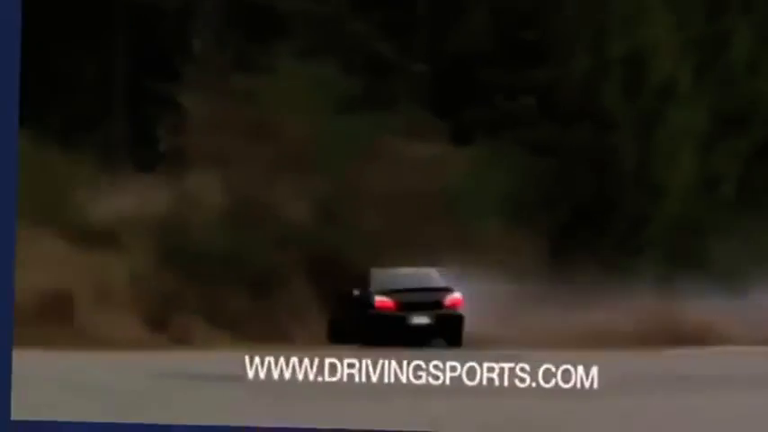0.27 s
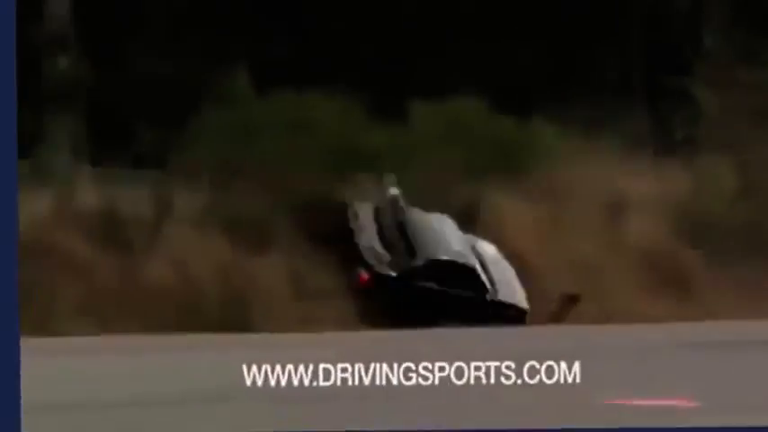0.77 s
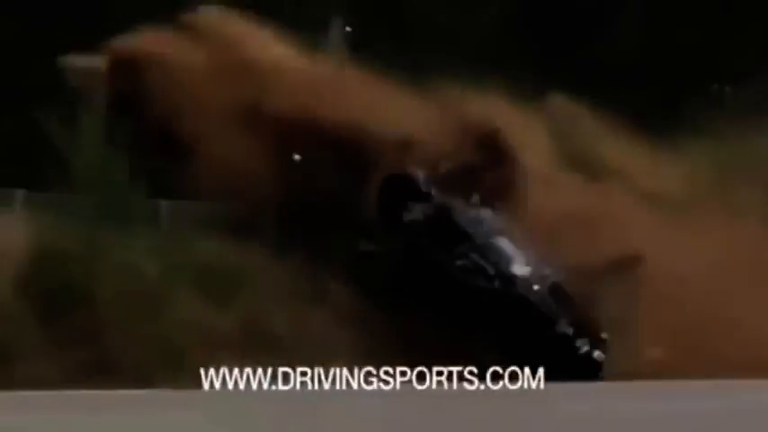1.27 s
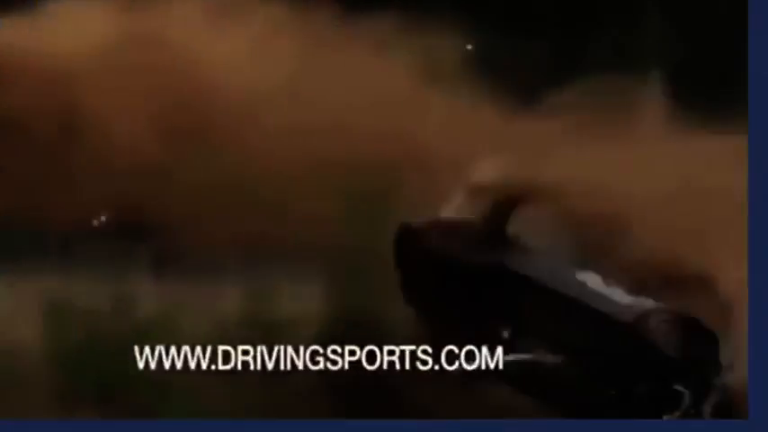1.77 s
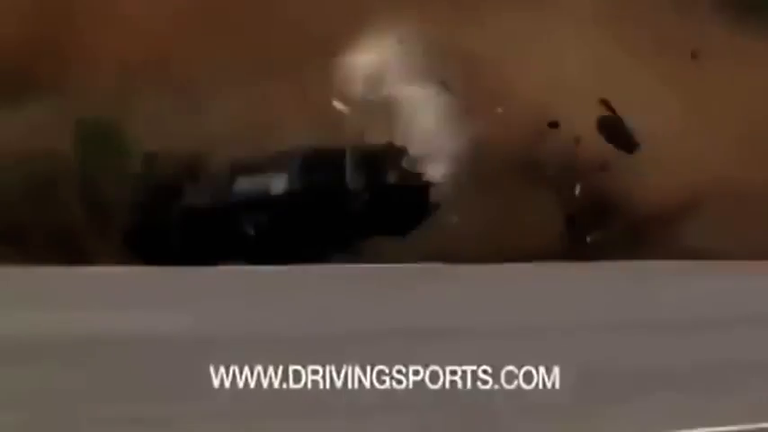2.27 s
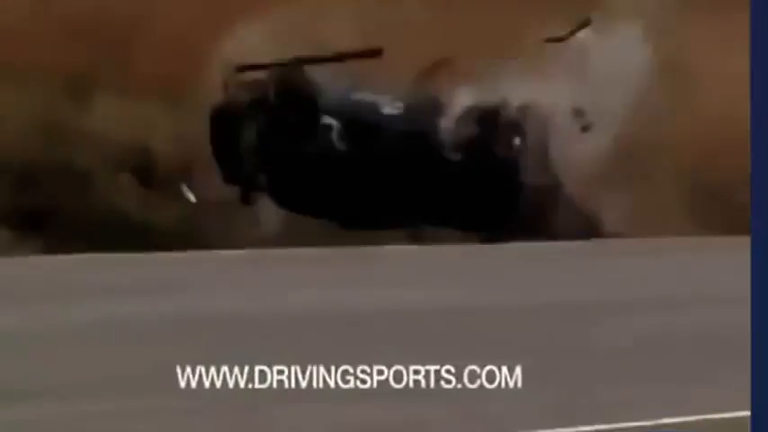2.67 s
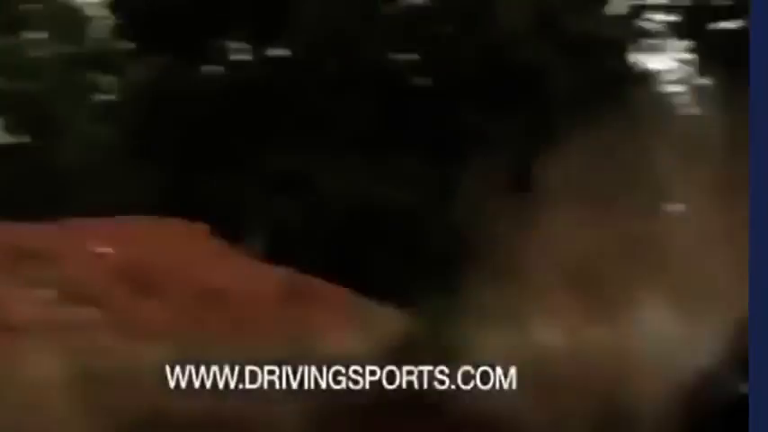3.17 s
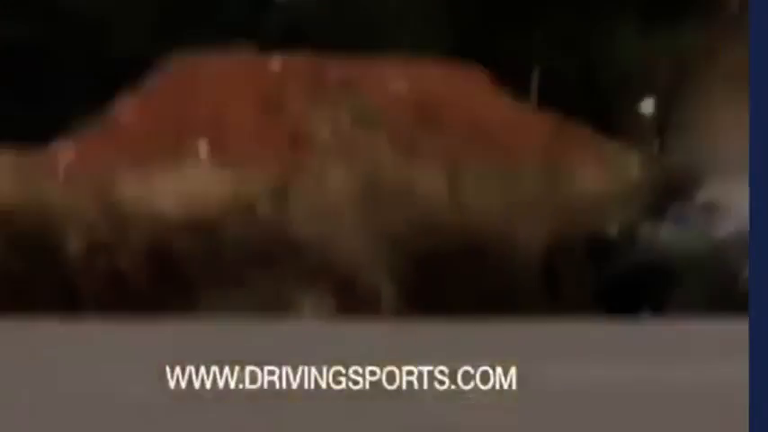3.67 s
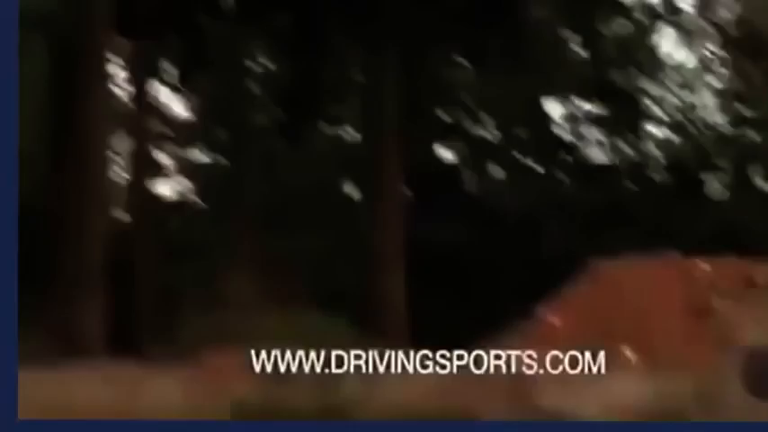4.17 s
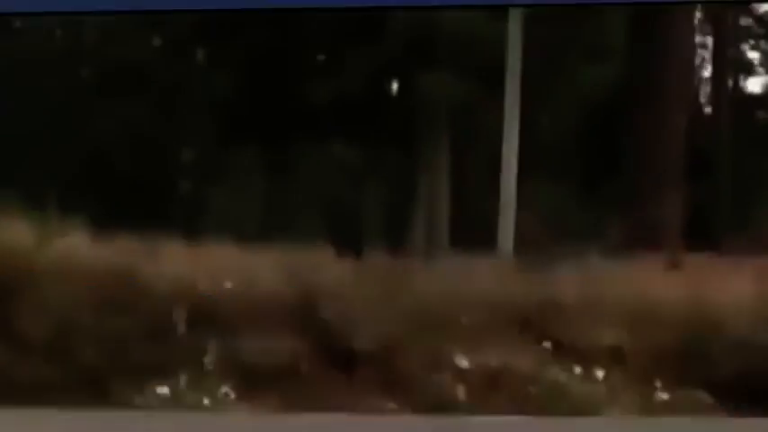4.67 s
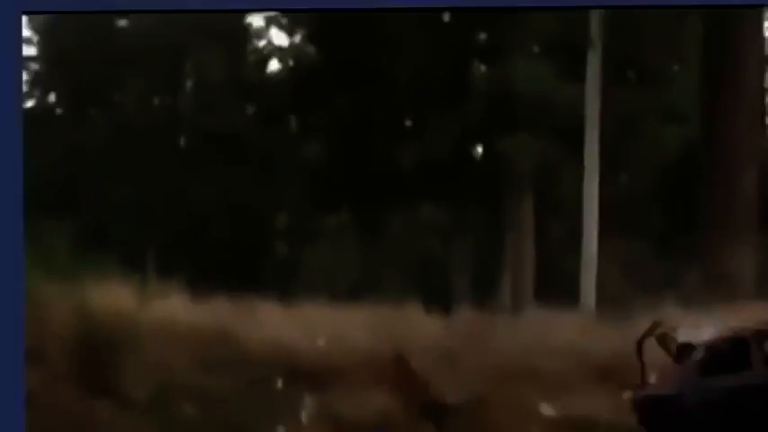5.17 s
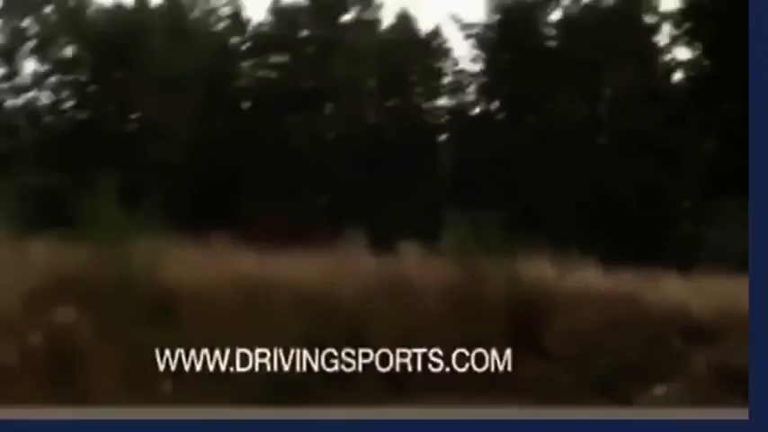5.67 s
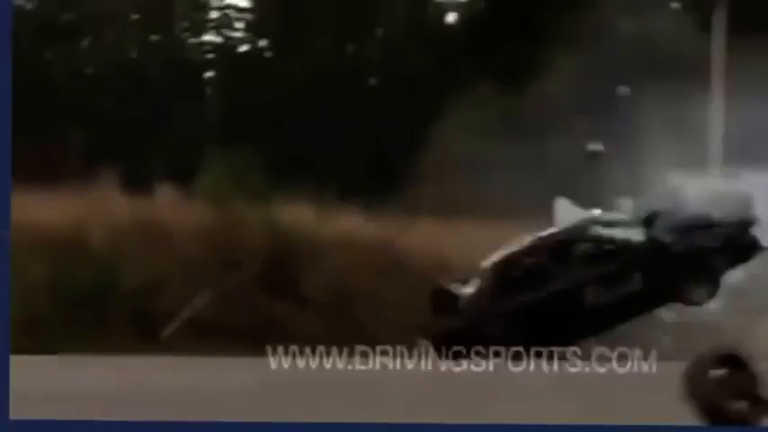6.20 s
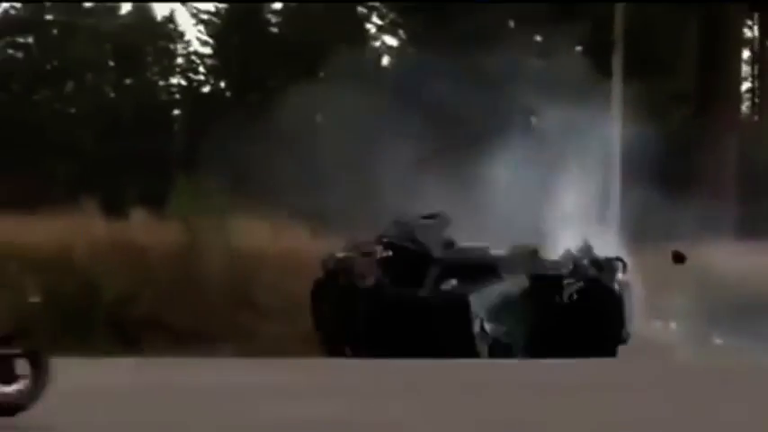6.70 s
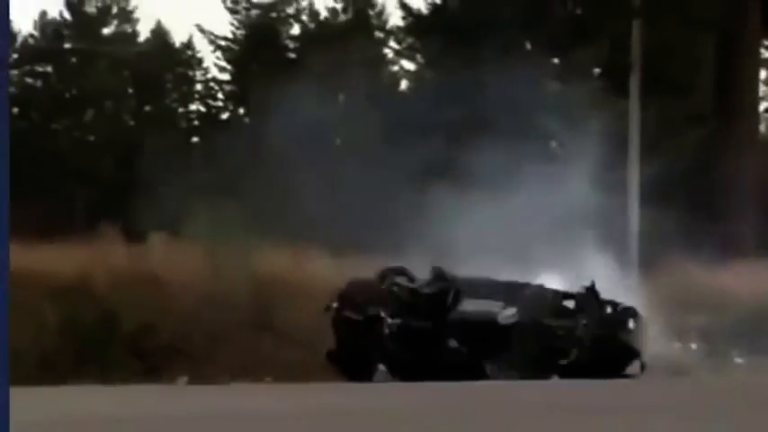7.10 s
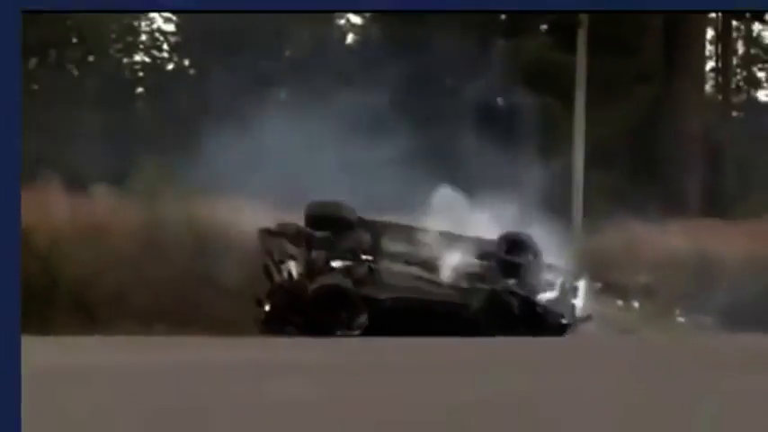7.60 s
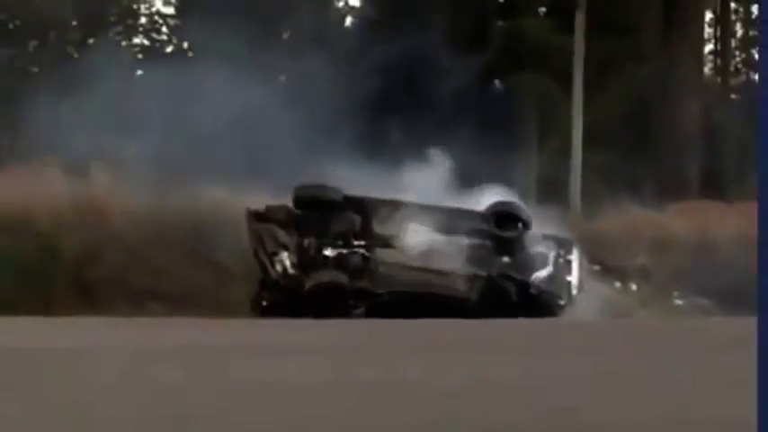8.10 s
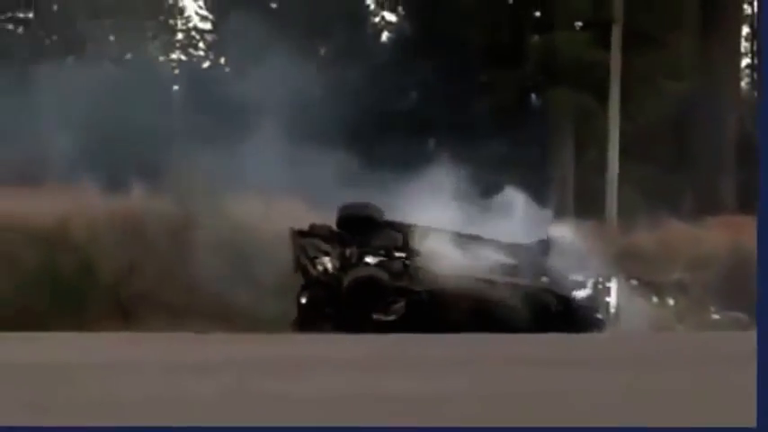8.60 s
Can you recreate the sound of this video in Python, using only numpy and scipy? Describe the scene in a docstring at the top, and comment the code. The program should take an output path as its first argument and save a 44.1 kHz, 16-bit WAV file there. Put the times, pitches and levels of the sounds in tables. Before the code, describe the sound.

A car crash is heard from a distance in the open air. A short, soft tyre skid gives way to a long run of uneven, heavy thuds and metal crunches as the car tumbles over dirt and tarmac. Grinding metal, spraying grit and a few small pings fill the gaps. The impacts grow denser, then weaken as the wreck settles, with a faint climbing hum and a small part rattling to the left.

```python
"""Tyres scrub and squeal over a low rumble as a car slides off the tarmac, outdoors and some way off.
It meets an earth bank and rolls over many times. Ground contact forces the shell to boom and drum,
buckling panels crack and clang in their modes, shards ring, and gravel and fragments rain down.
Near the end a torn-off part clanks on the left and a faint low hum climbs in pitch."""
import sys
import numpy as np
from scipy import signal
from scipy.fft import rfft, irfft
from scipy.io import wavfile
from scipy.ndimage import uniform_filter1d

SR = 44100
rng = np.random.default_rng(int(sys.argv[2]) if len(sys.argv) > 2 else 0)


def to_wav(sig):
    """Store sig (one row per channel, or 1-D mono) as 16-bit WAV at the path in sys.argv[1].

    Samples outside -1..1 are clipped; the rate is SR.
    """
    pcm = np.clip(np.atleast_2d(sig), -1, 1) * 32767
    pcm = np.round(pcm).astype(np.int16)
    wavfile.write(sys.argv[1], SR, pcm.T)  # frames by channels


N = 390285


def from_db(db):
    """Amplitude ratio of a level in decibels."""
    return 10 ** (np.asarray(db) / 20)


def rms_one(x):
    """Normalisation to an rms of 1."""
    return x / np.sqrt(np.mean(x ** 2) + 1e-20)


def in_time(rows):
    """Linear interpolation: each column after the time becomes a curve with one value a sample."""
    s, *columns = np.transpose(rows)
    return [np.interp(np.arange(N) / SR, s, column) for column in columns]


def colour(x, spectrum):
    """Minimum-phase filtering by a spectrum whose rows give frequency in Hz and gain in dB."""
    size = 2 ** 14
    hz, db = np.transpose(spectrum)
    grid_hz = np.maximum(np.arange(size // 2 + 1) * SR / size, 1)
    gain = from_db(np.interp(np.log(grid_hz), np.log(hz), db))
    cepstrum = irfft(np.log(gain))
    cepstrum[1:size // 2] *= 2   # folding onto positive time makes the filter causal
    cepstrum[size // 2 + 1:] = 0
    return signal.fftconvolve(x, irfft(np.exp(rfft(cepstrum))))[:N]


def drift(hz):
    """Random fluctuation: noise low-passed at the given frequency, rms 1."""
    r = np.exp(-2 * np.pi * hz / SR)
    return rms_one(signal.lfilter([1], [1, -2 * r, r * r], rng.standard_normal(N + SR))[SR:])


def resonate(x, hz, width_hz):
    """Forced response of a damped oscillator, with gain 1 at resonance."""
    r = np.exp(-np.pi * width_hz / SR)
    feedback = [1, -2 * r * np.cos(2 * np.pi * hz / SR), r * r]
    return signal.lfilter([(1 - r * r) / 2, 0, (r * r - 1) / 2], feedback, x)


def contacts(spectrum, per_s, spread_db, level_db):
    """Shot noise: random knocks of uneven size, filtered by a spectrum, follow a level curve."""
    sizes = from_db(spread_db * np.minimum(rng.exponential(1, N), 4)) * rng.choice([-1, 1], N)
    knocks = sizes * (rng.random(N) < per_s / SR)
    return rms_one(colour(knocks, spectrum)) * from_db(level_db)


def blow(t60, rise_s, bend=1):
    """Impact envelope: a quick rise and a 60 dB fall in t60 (0.02 to 1 s), steepening if bend > 1."""
    t = np.arange(SR // 2) / SR
    fall_db = 60 * np.minimum((t / np.clip(t60, .02, 1)) ** bend, 5)
    return (1 - np.exp(-t / rise_s)) * from_db(-fall_db)


def add(track, part, s):
    """Superposition of a short sound on a track, starting at s seconds."""
    at = round(s * SR)
    track[at:at + len(part)] += part[:N - at]


# Spectrum of the open air. Each row: frequency in Hz, relative level in dB.
AIR_SPECTRUM = [(18, -36), (30, -25), (178, -28), (291, -27), (527, -2), (1030, -40), (2560, -8.5),
                (4200, -17.5), (5650, -14), (11000, -14)]


def open_air():
    """Ambient noise: a faint, gently stirring hiss, uncorrelated between the two sides."""
    levels_db = [-69.5 + 1.5 * drift(12) for side in range(2)]
    return [from_db(db) * rms_one(colour(rng.standard_normal(N), AIR_SPECTRUM)) for db in levels_db]


# Level of the smeared copy against the car's own sound. Each row: frequency in Hz, gain in dB.
SMEAR_SPECTRUM = [(60, -31), (340, -69), (1950, -27.5), (11200, -2.5)]


def side_smear(car):
    """Decorrelation: a faint, mostly high, smeared copy of the car, opposite in sign on each side, sets the two
    sides slightly apart."""
    response = rng.standard_normal(SR // 2) * blow(t60=0.02, rise_s=0.002)
    smear = signal.fftconvolve(car, response / np.linalg.norm(response))[:N]
    return colour(smear, SMEAR_SPECTRUM) * np.array([[1], [-1]])


# Course of the hum. Each row: time in seconds, frequency in Hz, rms level of the upper tone in dB.
HUM_GLIDE = [(7.95, 109.5, -58), (8.606, 132, -52.5), (8.85, 135, -65)]


def hum():
    """Frequency glide: a faint low tone climbs with a weaker one at two thirds of its frequency."""
    hz, db = in_time(HUM_GLIDE)
    phase = 2 * np.pi * np.cumsum(hz) / SR
    fade_in = np.clip((np.arange(N) / SR - HUM_GLIDE[0][0]) / 0.048, 0, 1)
    return np.sqrt(2) * from_db(db) * fade_in * (np.sin(phase) + from_db(-6.5) * np.sin(phase * 2 / 3))


# Landings of a torn-off part. Each row: start in seconds, level in dB, rattling time in seconds.
PART_LANDINGS = [(8.075, -51, .05), (8.241, -45, .018), (8.827, -50, .03)]
# Modes of that part. Each row: frequency in Hz, relative level in dB.
PART_MODES = [(1610, 0.5), (2040, 4.5), (2600, 6), (3500, 2), (5200, 1), (5600, -0.5), (6200, -4)]


def loose_part():
    """Modal ringing: a part rattles on the tarmac to the left, and every touch excites its modes."""
    left_lead_db, t60, touches_per_s = 10.5, 0.023, 3000
    out = np.zeros(N)
    t = np.arange(SR // 4) / SR
    for s, db, rattle_s in PART_LANDINGS:
        sizes = from_db(3.4 * rng.exponential(1, len(t))) * rng.choice([-1, 1], len(t))
        touches = sizes * (rng.random(len(t)) < touches_per_s / SR)
        envelope = np.minimum(t / 0.0013, 1) * from_db(-60 * np.maximum(t - rattle_s, 0) / t60)
        modes = sum(from_db(mode_db) * resonate(touches, hz, width_hz=260) * (-1) ** k
                    for k, (hz, mode_db) in enumerate(PART_MODES))
        add(out, from_db(db) * envelope * rms_one(modes), s)
    return out * from_db([[left_lead_db / 2], [-left_lead_db / 2]])


# Ringing glass and metal. Each row: start in seconds, level in dB, frequency in Hz.
SHARD_PINGS = [(2.326, -40.5, 3400), (4.547, -42, 4530), (4.703, -28, 2950), (5.757, -49, 4440)]


def shards():
    """Damped free vibration: each shard rings briefly on an unsteady pitch."""
    out = np.zeros(N)
    for s, db, hz in SHARD_PINGS:
        envelope = blow(t60=0.08, rise_s=0.00064)
        waver = 1 + .03 * drift(300)[:len(envelope)]
        phase = 2 * np.pi * hz * np.cumsum(waver) / SR
        add(out, from_db(db) * envelope * np.sin(phase), s)
    return out


# Loudness of the sliding tyres. Each row: time in seconds, level in dB.
SCRUB_LEVELS = [(0.0, -43), (0.01, -49.5), (0.772, -65.5), (0.97, -61.5)]
# Spectrum of their scrubbing. Each row: frequency in Hz, relative level in dB.
SCRUB_SPECTRUM = [(530, -34), (900, -5), (1190, -13), (2200, -16.5), (3900, -34), (5070, -65), (8580, -120)]
# Squeal of the rubber. Each row: time in seconds, frequency in Hz, level in dB.
SQUEAL_GLIDE = [(0.05, 1350, -52.5), (.2, 1364, -60), (.29, 968, -58), (.49, 613, -48.5)]


def skid():
    """Sliding friction: tyres scrub on tarmac, then more faintly on grass, with a falling squeal."""
    t = np.arange(N) / SR
    (scrub_db,) = in_time(SCRUB_LEVELS)
    scrub = contacts(SCRUB_SPECTRUM, per_s=11000, spread_db=2.0, level_db=scrub_db + 3.0 * drift(14))
    hz, squeal_db = in_time(SQUEAL_GLIDE)
    unsteady_slip = 1 + .05 * drift(90)
    phase = 2 * np.pi * np.cumsum(hz * unsteady_slip) / SR
    hoarseness_db = 4.0 * drift(60)
    squeal = from_db(squeal_db + hoarseness_db) * np.sin(phase)
    return (t < SCRUB_LEVELS[-1][0]) * scrub + (t < SQUEAL_GLIDE[-1][0]) * squeal


def fragments(per_s, quality):
    """Poisson impacts: loose fragments tick at random, each on one of 14 resonances; rms 1."""
    pitches_hz = np.geomspace(1300, 3600, num=14)
    sizes = from_db(7.0 * np.minimum(rng.exponential(1, N), 4))
    hits = sizes * (rng.random(N) < per_s / SR)
    pitch_index = rng.integers(0, len(pitches_hz), size=N)
    return rms_one(sum(resonate(hits * (pitch_index == k) + 1e-18, hz, width_hz=hz / quality)
                       for k, hz in enumerate(pitches_hz)))


# Metal on earth and falling gravel. Each row: time in seconds, grinding level in dB, grit level in dB.
DEBRIS_LEVELS = [(0.97, -62, -69.5), (1.28, -53, -62), (1.52, -58, -64), (1.89, -55, -63.5),
                 (2.37, -58, -63), (2.7, -49, -57.5), (3.1, -57, -57), (3.4, -61.5, -67),
                 (3.98, -46.5, -51), (4.2, -52, -51), (4.79, -57, -54.5), (5.07, -48.5, -49.5),
                 (5.5, -58.5, -64), (5.9, -49.5, -56.5), (6.15, -58, -64.5), (7.01, -56.5, -62),
                 (7.35, -63, -70), (7.64, -60, -64), (7.9, -65.5, -74), (8.39, -70.5, -74),
                 (8.85, -78.5, -100)]
# Spectra of grinding metal and of fine grit. Each row: frequency in Hz, relative level in dB.
GRIND_SPECTRUM = [(710, -35), (1170, -3), (1500, 0), (2990, -1), (3450, -4), (3900, -31), (5070, -17),
                  (8580, -120)]
GRIT_SPECTRUM = [(2290, -10), (3600, 5.5), (4150, 1.5), (4900, 3.5), (6310, 2), (7770, -4), (8930, -17.5),
                 (10400, -6), (11000, -3)]


def debris(drum_db, jolt):
    """Abrasion: from the bank onward metal grinds and gravel flies, more so as the drumming swells."""
    bank_s = 0.97
    grind_db, grit_db = in_time(DEBRIS_LEVELS)
    press_db = drum_db - uniform_filter1d(drum_db, size=SR // 3)
    scrape_db = grind_db + 0.41 * press_db + 0.92 * jolt
    grind = contacts(GRIND_SPECTRUM, per_s=3000, spread_db=1.5, level_db=scrape_db + 1.64 * drift(44))
    ticks = from_db(scrape_db - 7.5) * fragments(per_s=250, quality=30)
    spray_db = grit_db + 0.25 * press_db + 1.2 * jolt + 2.0 * drift(20)
    grit = contacts(GRIT_SPECTRUM, per_s=17000, spread_db=4.5, level_db=spray_db)
    return (np.arange(N) / SR > bank_s) * (grind + ticks + grit)


# The shell presses on the ground. Each row: start, swell time and hold time in seconds,
# boom level and drumming level in dB, decay rate in dB per second.
SHELL_LANDINGS = [(0.962, 0.1, 0.0028, -23, -27, 169), (1.144, 0.085, 0.022, -27.5, -33.5, 445),
                  (1.59, 0.14, 0.0084, -34.5, -37, 150), (1.769, 0.068, 0.053, -33, -33, 99),
                  (2.108, 0.015, 0.0091, -41, -41, 162), (2.429, 0.028, 0.075, -27, -35, 602),
                  (2.564, 0.12, 0.082, -35.5, -34.5, 169), (2.838, 0.0072, 0.065, -33, -37, 84),
                  (3.327, 0.049, 0.0084, -35, -42, 97), (3.481, 0.051, 0.0075, -29.5, -37, 202),
                  (3.761, 0.032, 0.051, -29.5, -32, 74), (3.944, 0.035, 0.032, -41, -35, 125),
                  (4.283, 0.076, 0.07, -28.5, -29.5, 97), (4.733, 0.03, .01, -43, -38.5, 200),
                  (4.894, 0.019, 0.078, -35, -33.5, 75), (5.026, 0.034, 0.063, -32.5, -28.5, 119),
                  (5.432, 0.016, 0.02, -28, -31, 298), (5.577, 0.011, 0.013, -48, -39.5, 50),
                  (5.777, 0.008, 0.13, -33, -29, 74), (6.271, 0.012, 0.016, -30.5, -31.5, 105),
                  (6.78, 0.051, 0.019, -36.5, -36, 46), (7.422, 0.12, 0.0095, -35.5, -31.5, 151),
                  (7.788, 0.038, 0.02, -39, -38.5, 115), (7.97, 0.077, 0.0041, -42.5, -42.5, 200),
                  (8.07, 0.013, 0.023, -36, -39.5, 301), (8.78, 0.056, .01, -41, -44, 100)]


def landing_power():
    """Incoherent addition: boom and drumming powers sum over landings that swell, hold and decay."""
    swell_db = 15.5
    t = np.arange(N) / SR
    power = np.zeros((2, N))
    for s, swell_s, hold_s, boom_db, drum_db, fall_db_per_s in SHELL_LANDINGS:
        now = slice(round(s * SR), round((s + 1) * SR))
        age = t[now] - s
        rise_db = -swell_db * np.clip(1 - age / swell_s, 0, 1)
        fall_db = fall_db_per_s * np.maximum(age - swell_s - hold_s, 0)
        power[:, now] += from_db(rise_db - fall_db + [[boom_db], [drum_db]]) ** 2
    return power


# Rumble beneath the landings. Each row: time in seconds, boom level in dB, drumming level in dB.
RUMBLE_LEVELS = [(0, -41.5, -48.5), (.42, -34.5, -43.5), (.7, -41.5, -47.5), (1.3, -36.5, -47.5),
                 (1.55, -47, -56), (2.3, -49, -53.5), (3.2, -46, -51.5), (3.65, -41.5, -41),
                 (4.7, -49, -49.5), (5.35, -46.5, -45.5), (6.6, -43, -43.5), (7.35, -47, -48),
                 (8.4, -51, -54), (8.85, -62, -61.5)]
# Spectra of the shell's low boom and higher drumming. Each row: frequency in Hz, relative level in dB.
BOOM_SPECTRUM = [(15, -49), (25, -24), (54, -6), (145, 1.5), (178, 4), (246, -2), (300, -14), (390, -46.5),
                 (660, -120)]
DRUM_SPECTRUM = [(180, -19), (300, -2.5), (477, 2.5), (539, -2), (605, -10), (833, -9.5), (1200, -24.5),
                 (1560, -26.5), (2640, -120)]


def rolling():
    """Forced vibration: ground contact makes the shell boom, drum and grind, all sharing its jolts."""
    rumble_power = from_db(in_time(RUMBLE_LEVELS)) ** 2
    boom_db, drum_db = 10 * np.log10(rumble_power + landing_power())
    jolt = drift(18)
    boom = contacts(BOOM_SPECTRUM, per_s=900, spread_db=0.0, level_db=boom_db + 0.9 * jolt)
    drum = contacts(DRUM_SPECTRUM, per_s=900, spread_db=2.0, level_db=drum_db + 2.0 * jolt)
    return boom + drum + debris(drum_db, jolt)


# The shell hits the ground. Each row: start in seconds, level in dB, shell resonance in Hz,
# relative level of the ground push in dB.
GROUND_HITS = [(1.623, -33, 185, -22), (2.114, -30, 173, -15), (2.455, -38, 151, 8), (2.689, -25, 574, -1),
               (3.504, -25, 202, -24), (3.777, -36, 400, -17.5), (3.817, -20.5, 382, -21),
               (3.989, -21, 504, -29), (4.341, -26, 516, -24), (4.488, -25, 910, -25),
               (4.77, -31, 486, -22), (4.908, -28, 815, -25), (4.96, -24, 252, -8), (5.055, -27, 480, -12),
               (5.13, -24, 354, -14), (5.445, -39, 222, 6), (5.587, -25, 185, -18), (5.782, -38, 567, -5),
               (5.861, -21, 530, -23), (6.16, -27.5, 520, -29), (6.192, -27, 500, -32),
               (6.293, -26.5, 115, -7), (6.564, -29.5, 400, -18), (6.822, -28.5, 414, 2),
               (7.448, -21.5, 524, -20), (7.548, -30, 397, -19), (8.079, -25, 520, -28),
               (8.097, -28, 540, -30), (8.249, -27.5, 525, -21), (8.826, -30, 465, -29)]


def thuds():
    """Impact excitation: each hit pushes the ground, rings a shell resonance and knocks the panels."""
    out = np.zeros(N)
    for s, db, hz, push_db in GROUND_HITS:
        shake = rng.standard_normal(SR // 2) * blow(t60=0.078, rise_s=0.00013)
        ring = resonate(shake, hz, width_hz=0.16 * hz)
        push = resonate(resonate(shake, 48, width_hz=79), 48, width_hz=79)
        knock = resonate(shake, 493, width_hz=29) - 0.17 * resonate(shake, 835, width_hz=115)
        for part, peak_db in ((ring, -5), (push, push_db), (knock, -6)):
            add(out, from_db(db + peak_db) * part / np.abs(part).max(), s)
    return out


# Panels buckle and fragments strike. Each row: start in seconds, relative level in dB,
# clang frequency in Hz, nominal decay time in seconds, relative treble level in dB.
PANEL_CRACKS = [(0.987, -39.5, 1670, 0.24, -33), (1.064, -29, 1860, 0.3, -34),
                (1.249, -36, 2260, 0.21, -14), (1.354, -34.5, 2130, 0.43, -17),
                (1.454, -29, 1730, 0.037, -39), (2.091, -32, 2220, 0.39, -19.5),
                (2.294, -26, 3240, 0.038, -12), (2.7056, -21.5, 3230, 0.13, -18.5),
                (2.763, -23.5, 1740, 0.11, -21), (2.858, -30.5, 1430, 0.25, -14.5),
                (2.99, -25.5, 1350, 0.084, -24), (3.501, -33, 1870, 0.44, -21),
                (3.7773, -38, 1320, 0.12, -28), (3.823, -17, 1700, 0.12, -24),
                (3.943, -19.5, 3350, 0.079, -16), (4.019, -17, 2320, 0.057, -21),
                (4.073, -21, 2860, 0.057, -15), (4.135, -22, 2180, 0.077, -15),
                (4.317, -15, 2420, 0.12, -17), (4.366, -24, 3030, 0.52, -14.5),
                (4.429, -15.5, 2060, 0.065, -13.5), (4.449, -19, 3350, 0.1, -15),
                (4.591, -28, 1760, 0.067, -17), (4.704, -23.5, 2860, 0.13, -14.5),
                (4.773, -25.5, 2620, 0.11, -16), (4.908, -27, 1340, 0.13, -37),
                (4.936, -27, 1780, 0.12, -18), (5.101, -17.5, 1660, 0.13, -19.5),
                (5.14, -17, 2090, 0.11, -24), (5.434, -26.5, 3320, 0.063, -4),
                (5.487, -31.5, 2380, 0.19, -14), (5.5907, -35, 1550, 0.1, -30),
                (5.657, -19, 1970, 0.051, -16), (5.78, -18, 1690, 0.037, -18.5),
                (5.827, -19, 1350, 0.23, -16.5), (5.8596, -15, 1600, 0.067, -25),
                (5.955, -26.5, 2510, 0.14, -33), (6.1951, -28.5, 3400, 0.13, -9),
                (6.275, -30.5, 1730, 0.31, -37), (6.314, -32.5, 1650, 0.69, -10),
                (6.38, -31, 1320, 0.17, -12), (6.795, -28.5, 2380, 0.19, -41),
                (6.842, -28.5, 2100, 0.24, -16), (7.155, -34, 3200, 0.11, -10),
                (7.444, -31.5, 3050, 0.53, -14), (7.544, -22, 1900, 0.1, -25),
                (7.609, -30.5, 1990, 0.053, -21), (7.736, -39.5, 1500, 0.21, -33),
                (8.295, -38.5, 2780, 0.046, -0.5)]
# Modes of the bodywork. Each row: frequency in Hz, bandwidth in Hz, relative level in dB.
BODY_MODES = [(577, 12.6, 11), (810, 23, -1.5), (960, 50, 4.5)]


def cracks():
    """Buckling: each burst of tearing has a clang of its own and excites the modes of the bodywork."""
    jerks = from_db(3.2 * drift(140))   # the sheet gives way unevenly
    noise = jerks * rng.standard_normal(N)
    tear = rms_one(colour(noise, GRIND_SPECTRUM))
    splinter = rms_one(colour(noise, GRIT_SPECTRUM))
    # Where a blow lands decides which modes speak, and crumpling shifts their frequencies.
    shares_db = rng.normal(0, 3, (len(PANEL_CRACKS), len(BODY_MODES)))
    detunings = rng.uniform(.9, 1.1, len(PANEL_CRACKS))
    out = np.zeros(N)
    for (s, db, hz, decay_s, treble_db), mode_shares, detune in zip(PANEL_CRACKS, shares_db, detunings):
        at = round(s * SR)
        decay = blow(t60=0.81 * decay_s, rise_s=0.0025, bend=1.345)[:N - at]
        snap = 0.65 * blow(t60=0.015, rise_s=0.00016)[:N - at]
        burst = snap + decay
        now = slice(at, at + len(burst))
        tearing = burst * tear[now]
        treble = from_db(treble_db + 10.5) * decay * splinter[now]
        clang = from_db(2.0) * resonate(tearing, hz, width_hz=125)
        for (mode_hz, width_hz, mode_db), share_db in zip(BODY_MODES, mode_shares):
            mode = resonate(burst * noise[now], detune * mode_hz, width_hz)
            clang += from_db(mode_db + share_db + 15.0) * mode
        add(out, from_db(db - 17.0) * (tearing + treble + clang), s)
    return out


# The car is a little louder on the left. Each row: time in seconds, left minus right level in dB.
CAR_BALANCE = [(0, 1.6), (1.0, .6), (7.3, .3), (8.2, 1.8)]


def scene():
    """Superposition in stereo: the car, a faint smeared copy of it opposite in sign on each side, the loose
    part and the open air."""
    car = skid() + rolling() + thuds() + cracks() + shards() + hum()
    (balance_db,) = in_time(CAR_BALANCE)
    panned = car * from_db([balance_db / 2, -balance_db / 2])
    return open_air() + panned + side_smear(car) + loose_part()


def comb(x, delay, depth, sharpness):
    """Interference: delayed copies cut evenly spaced dips in the spectrum; feedback narrows them."""
    lag = round(delay)
    zero = sharpness + (1 - sharpness) * depth
    out = x.copy()
    out[:, lag:] -= zero * x[:, :-lag]
    for i in range(lag, N, lag):
        out[:, i:i + lag] += sharpness * out[:, i - lag:i][:, :N - i]
    return out


# Combs of narrow spectral dips. Each row: delay in samples, depth from 0 to 1, sharpness from 0 to 1.
COMBS = [(289.9, 0.46, 0.57), (147, 0.36, 0.87)]


def record(dry):
    """Filters in cascade: two combs colour the sound and a steep low-pass removes the highest treble."""
    stopband_hz = 11300
    for delay, depth, sharpness in COMBS:
        dry = comb(dry, delay, depth, sharpness)
    return signal.sosfilt(signal.cheby2(18, 60, stopband_hz, fs=SR, output="sos"), dry)


dry = scene()
out = record(dry)
to_wav(out)
```